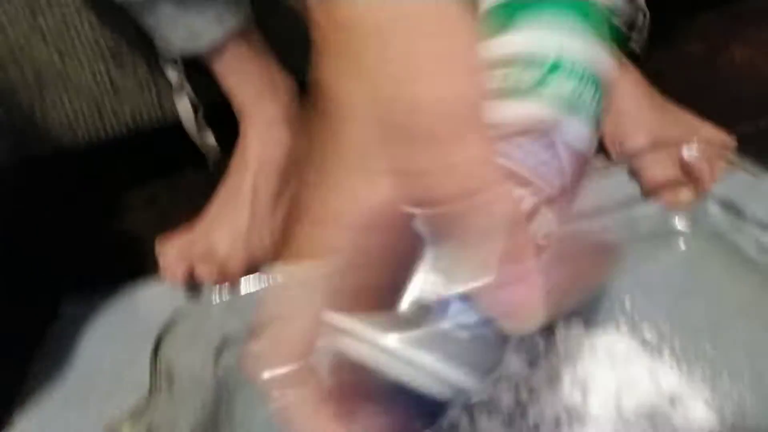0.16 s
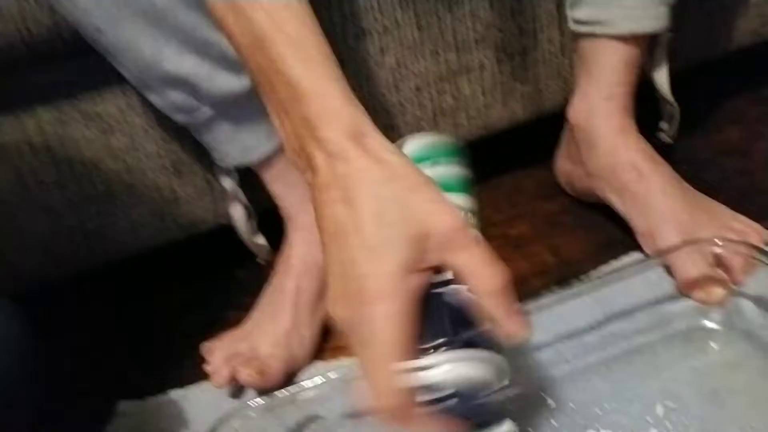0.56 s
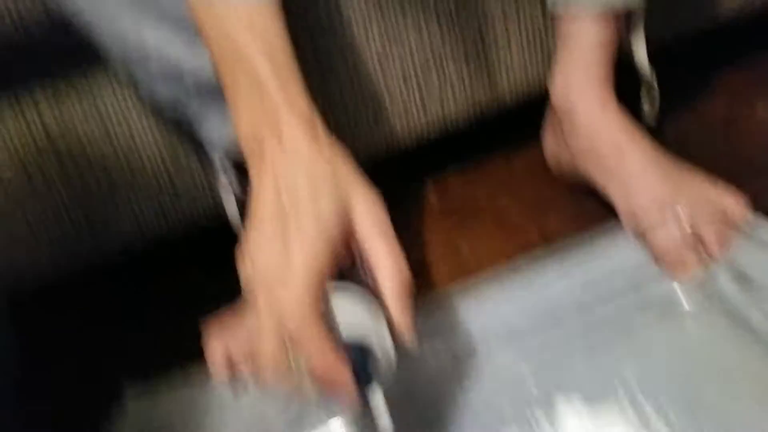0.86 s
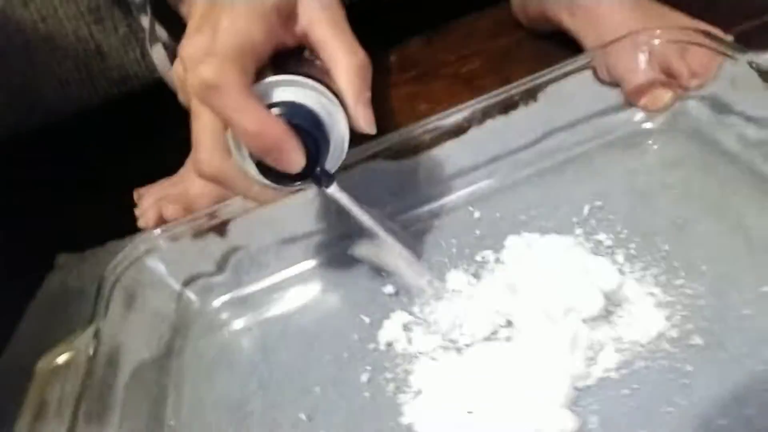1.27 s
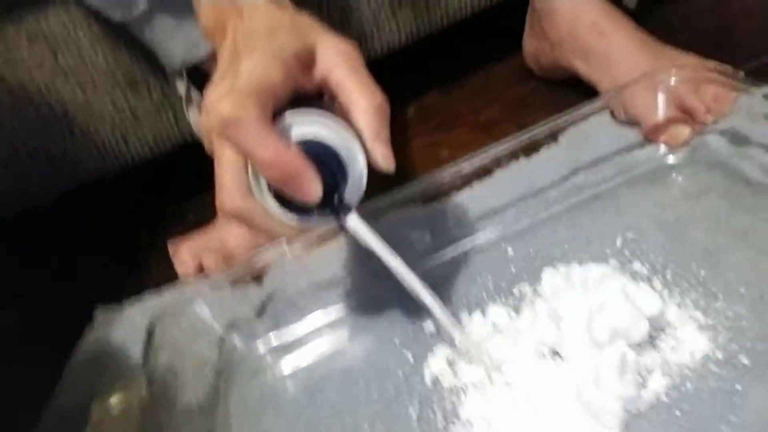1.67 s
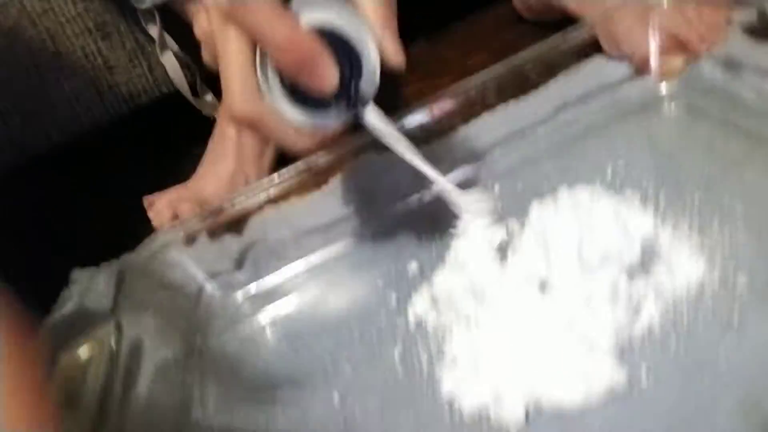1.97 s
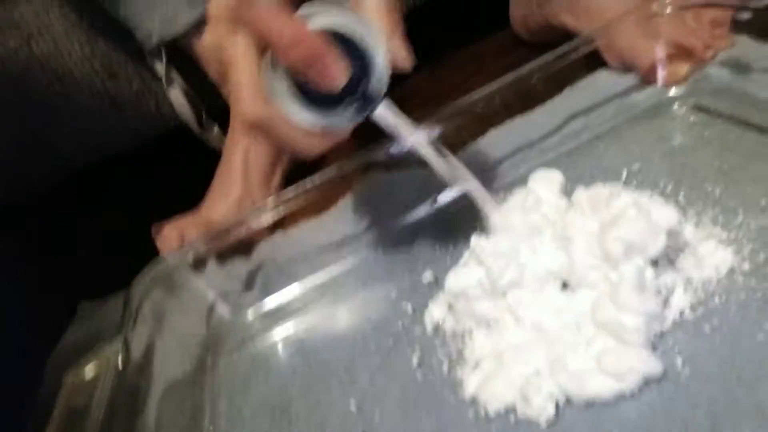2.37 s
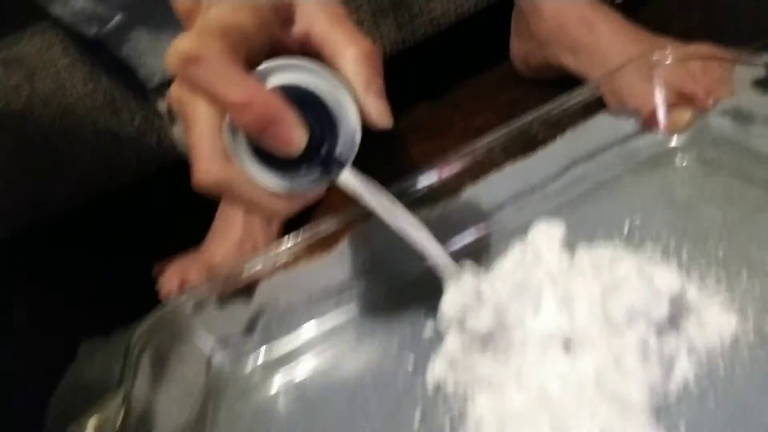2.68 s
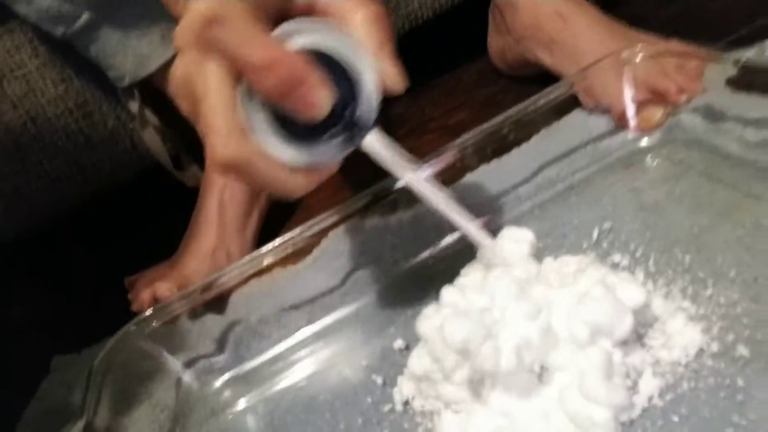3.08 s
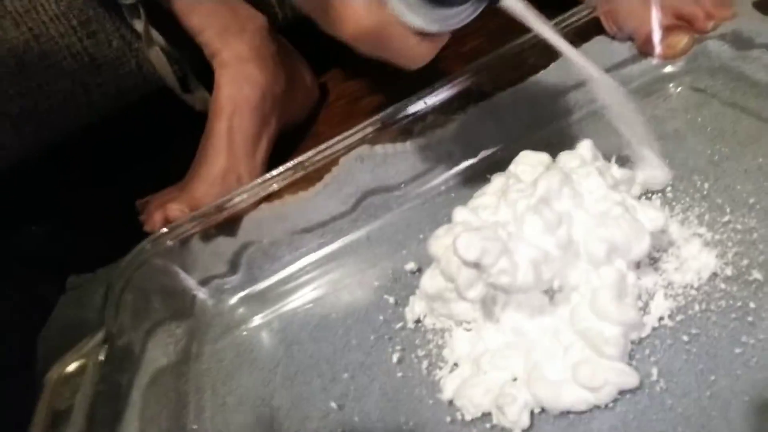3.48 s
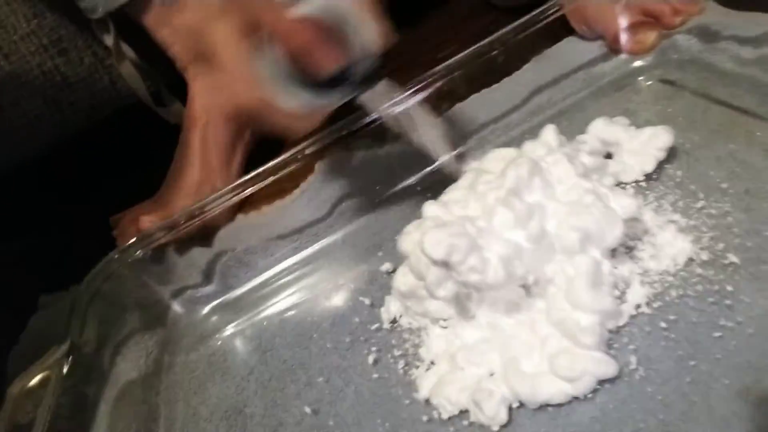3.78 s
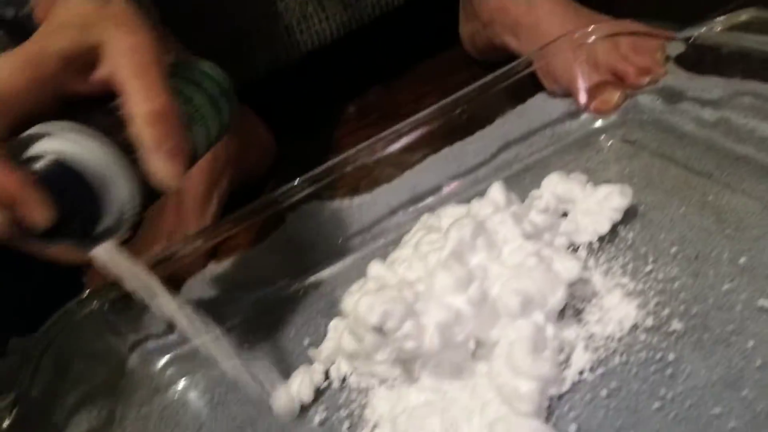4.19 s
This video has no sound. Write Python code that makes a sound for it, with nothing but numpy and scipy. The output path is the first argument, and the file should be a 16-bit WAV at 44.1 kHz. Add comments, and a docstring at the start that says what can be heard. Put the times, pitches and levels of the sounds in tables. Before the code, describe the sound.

Quiet handling first: skin and cloth rubbing, tiny clicks, a faint high squeak and a dull double thud against a dish. Then pressurized gas bursts out sharply, stutters, and becomes a softer foam jet that hisses and spits unevenly, with foam landing in a low rush. Recorded very near indoors, with short glass-dish reflections and bumps on the microphone body.

```python
"""Shaving foam sprays from an aerosol can: a propellant gas burst breaks into puffs, then a foam jet hisses and spits,
with a few later gas puffs. Jet: flickering noise bands, noisy resonances and ringing gas pockets under one uneven
flow; foam lands as a low rush.
Before it a hand shakes the can (rustle, swish, ticks, squeak) and sets it on a glass dish with a low knock.
Two hand-held microphone ports hear it from the left, with dish echo, near reflections and handling rumble."""
import sys
import numpy as np
from scipy import signal
from scipy.fft import rfft, irfft
from scipy.io import wavfile
from scipy.ndimage import map_coordinates

SR = 44100
rng = np.random.default_rng(int(sys.argv[2]) if len(sys.argv) > 2 else 0)


def persist_wave(psi):
    """Save psi, clipped to +-1, as 16-bit WAV."""
    counts = np.round(np.clip(psi, -1, 1) * 32767).astype(np.int16)
    wavfile.write(sys.argv[1], SR, np.atleast_2d(counts).T)


N = 191570

# jet: t/s, gas hiss/dB, foam hiss/dB, foam body/dB, top sizzle/dB, nozzle resonance f/Hz
JET_CURVES = [(0.935, -27, -26, -60, -36, 4360), (1.05, -24.5, -32, -49, -41, 4700),
              (1.17, -26.5, -30.5, -41, -34, 4440), (1.255, -27.5, -45, -42, -34, 4310),
              (1.29, -40, -37.5, -44, -45, 5300), (1.39, -43.5, -43.5, -44.5, -45, 5430),
              (1.52, -44.5, -44.5, -44, -54, 5293), (1.62, -44.5, -42, -43, -51, 5083),
              (1.92, -41, -39.5, -41.5, -53, 5607), (2.03, -54, -41, -46.5, -49, 4430),
              (2.45, -47.5, -43.5, -44, -51, 4523), (2.76, -45.5, -41.5, -43, -47.5, 4500),
              (3.13, -45.5, -43, -41.5, -46, 4715), (3.27, -45, -44, -42.5, -49, 3845),
              (3.41, -47.5, -41, -41.5, -51, 3880), (3.53, -46, -46, -46.5, -47, 3910),
              (3.6, -45.5, -43, -43.5, -52, 3887), (3.72, -48, -39, -42.5, -53, 4060),
              (3.8, -42.5, -40, -40.5, -51, 4710), (3.94, -46.5, -39.5, -45, -49, 4284),
              (4.11, -41, -39.5, -47, -53, 4240), (4.22, -47.5, -36.5, -47, -58, 4950),
              (4.34, -42, -35.5, -43, -59, 4960)]
# gas puffs, most as the burst breaks up, a few later in the foam jet: centre t/s, level/dB
GAS_PUFFS = [(1.278, -35), (1.302, -27.5), (1.33, -31), (1.343, -25), (1.362, -35), (1.403, -28),
             (1.42, -29), (1.434, -28), (1.448, -30), (1.471, -27), (1.489, -37), (1.507, -31),
             (1.524, -45), (1.544, -30), (1.557, -32), (1.578, -54), (1.96, -51), (2.325, -36),
             (2.612, -30), (2.874, -39), (3.554, -41)]
# open-valve resonance: t/s, f/Hz, level over gas/dB
VALVE_RESONANCE = [(.91, 3070, 5.5), (1.0, 3135, -11), (1.07, 2850, -17), (1.14, 2795, -18),
                   (1.26, 2900, -15), (1.35, 2960, -16)]
# jet resonances: t/s, nozzle level over foam hiss/dB, low resonance f/Hz, its level over foam body/dB
JET_RESONANCES = [(.92, -17, 1678, -8), (1.5, -7, 1650, -6), (1.9, -7, 1600, -8), (2.2, -2, 1622, -6.5),
                  (2.55, -3, 1615, -9), (2.8, 1, 1332, -6.5), (3.1, -3.5, 1348, -7), (3.3, -2, 1400, -5),
                  (3.55, -3.5, 1882, -6), (3.72, -8, 1823, -11), (3.85, -8.5, 1690, -6),
                  (4.34, -10, 1662, -12)]
# loud spits at the nozzle: t/s, level/dB, f/Hz
LOUD_SPITS = [(0.915, -26, 3000), (0.9205, -21, 2850), (0.924, -14.5, 3107), (0.931, -33, 3000),
              (0.9454, -31, 3050), (0.969, -12, 5970), (0.973, -19, 6800), (0.981, -11, 6900),
              (0.986, -12, 6860), (1.0074, -10.5, 2705), (1.023, -22, 793), (1.0437, -3.5, 8940),
              (1.0614, -22, 2870), (1.071, -12.5, 4610), (1.092, -11, 4950), (1.0976, -15, 6160),
              (1.1265, -17, 2730), (1.131, -7, 6100), (1.1366, -11, 8900), (1.153, -28, 2300),
              (1.1678, -6, 8800), (1.1932, -14, 3660), (1.2163, -12.5, 2876), (1.246, -14.5, 3720),
              (1.276, -21, 5560), (1.295, -16.5, 5600), (1.331, -19, 5400), (1.3608, -18, 5380),
              (1.4, -21, 5800), (1.4283, -13.5, 8270), (1.4461, -18, 5380), (1.4706, -18, 6370),
              (1.488, -14.5, 6280), (1.506, -18, 5340), (1.5224, -17, 8270), (1.5284, -7, 8530),
              (1.5444, -23, 5420), (1.61, -44, 4500), (1.6601, -25.5, 4320), (1.6855, -17, 5600),
              (1.7454, -21, 5410), (1.8312, -21, 5550), (1.847, -17.5, 5720), (1.8602, -26, 5700),
              (1.9097, -15, 5730), (2.0098, -23, 4900), (2.032, -25.5, 8160), (2.071, -21, 4100),
              (2.1268, -25, 4400), (2.2109, -25, 4350), (2.2643, -26, 5290), (2.3042, -20, 4540),
              (2.4277, -25, 5920), (2.4632, -20, 4500), (2.4845, -20.5, 4300), (2.531, -25, 5170),
              (2.613, -21.5, 5370), (2.6835, -39, 4670), (2.7487, -24, 4180), (2.7614, -28, 4300),
              (2.819, -39, 4320), (2.8724, -15.5, 4520), (2.8759, -24, 8800), (2.906, -21, 4650),
              (3.076, -25, 5260), (3.3162, -28.5, 3555), (3.413, -24.5, 4570), (3.503, -25, 5300),
              (3.5117, -24, 4180), (3.526, -26, 3800), (3.538, -22, 4295), (3.554, -19.5, 8040),
              (3.604, -29, 3660), (3.612, -26, 3800), (3.681, -24, 3890), (3.6925, -21, 7080),
              (3.7176, -28, 3760), (3.761, -27, 4830), (3.7664, -23, 7740), (3.8626, -25, 4450),
              (3.9755, -19, 7800), (3.9792, -19, 4130), (3.9898, -24, 7800), (4.0419, -23, 7830),
              (4.0647, -19, 8370), (4.1643, -20, 5150), (4.2166, -24, 3740), (4.2304, -10, 5400),
              (4.251, -19, 5093), (4.2564, -23, 5490), (4.2604, -19, 7060), (4.2775, -21, 4000),
              (4.2992, -16, 5280), (4.3201, -28, 5420), (4.3364, -17, 5180)]
# foam landing in the dish: t/s, level/dB
LANDING_CURVE = [(.9, -75), (0.95, -65), (1.02, -37.5), (1.14, -47), (1.41, -42.5), (1.6, -48.5),
                 (1.8, -46.5), (3.39, -47), (3.84, -44), (4.1, -46), (4.34, -43)]
# relative noise spectra, each: f/Hz, density/dB
GAS_SPECTRUM = [(350, -71), (600, -27), (777, -2.5), (940, -7.5), (1150, -3), (1430, -40), (1690, 5),
                (1880, -23), (2100, 2.5), (2480, -8.5), (2700, 0.5), (3250, 2), (3600, -24), (3850, 1),
                (4120, -32), (4800, -2.5), (5550, -6), (6230, -3.5), (9000, -2.5), (15500, -6.5)]
FOAM_HISS_SPECTRUM = [(1410, -43), (2400, -7), (3250, -1), (4480, 0), (4840, -1.5), (5560, -2.5),
                      (6420, -6.5), (8100, -7), (9000, -11.5), (11700, -53), (19800, -120)]
FOAM_BODY_SPECTRUM = [(590, -11), (1000, -5), (1150, -7), (1320, 5), (1440, -1.5), (1680, 2), (2180, -1.5),
                      (2480, -9.5), (2900, 0), (3770, -73), (6380, -120)]
SIZZLE_SPECTRUM = [(7060, -64), (12000, -23), (13100, -4), (14600, 8), (15500, 4)]
LANDING_SPECTRUM = [(120, -19), (200, -15), (227, -29), (280, -13), (608, 0.5), (1140, -1.5), (1300, -4),
                    (1690, -31), (2860, -120)]
RUSTLE_SPECTRUM = [(470, -32), (800, 1.5), (1140, 7), (1360, -3.5), (2090, -2), (2450, -20), (2740, -11),
                   (3560, -14), (6000, -21), (7800, -63), (13200, -120)]
RUB_SPECTRUM = [(130, -35), (220, -18), (327, -0.5), (459, -12), (683, 5), (950, 5), (1240, -47),
                (2090, -120)]
SWISH_SPECTRUM = [(1060, -35), (1800, -13), (2250, -8), (2800, -2), (3840, -5), (4980, -7.5), (6650, -13),
                  (8180, -11), (15500, -9)]
HAND_SPECTRUM = [(15, -47), (25, -8), (59, 1), (123, 7), (365, -10.5), (409, -4), (500, -15), (650, -37),
                 (1100, -120)]
# hand and can moving before the spray: t/s, scrape base level/dB, dull cloth rub/dB
MOVE_CURVES = [(0.0, -66, -55), (0.09, -49, -51), (0.108, -51, -53), (0.13, -55, -42.5), (0.19, -57, -59),
               (0.23, -60, -63), (0.34, -51.5, -54), (0.39, -52, -48.5), (0.5, -60.5, -71),
               (0.66, -51.5, -52), (0.73, -48, -49), (0.844, -46, -55), (0.9, -50, -68)]
# air round the swung can: t/s, level/dB
SWING_CURVE = [(0, -57), (.13, -54), (.2, -59.5), (.41, -44), (.51, -52), (.7, -57.5), (.85, -61)]
# small ticks of can and fingers: t/s, level/dB, f/Hz
FINGER_TICKS = [(0.055, -40.5, 500), (0.0565, -36.5, 3420), (0.0685, -48, 500), (0.0695, -37, 3400),
                (0.078, -37, 635), (0.084, -34, 690), (0.092, -35, 674), (0.119, -36, 695.6),
                (0.128, -45, 510), (0.129, -31.5, 2430), (0.135, -29, 2400), (0.163, -39, 633),
                (0.177, -39, 2544), (0.183, -31, 4000), (0.189, -41, 2720), (0.199, -31.5, 2838),
                (0.223, -44, 2400), (0.249, -39, 710), (0.268, -35, 710), (0.562, -35, 3500),
                (0.578, -42, 4000), (0.596, -32, 2690), (0.596, -34, 730), (0.688, -39, 1750),
                (0.735, -36.5, 1820), (0.765, -50, 1400), (0.792, -44, 1360), (0.831, -38, 1580),
                (0.835, -36, 1400), (0.838, -43, 1310), (0.847, -31, 1280), (0.848, -50, 3700)]
# can against the dish on the floor: t/s, click level before softening/dB
KNOCK_CLICKS = [(0.713, -26), (0.7272, -26.5), (0.941, -38.5)]
# floor resonances: f/Hz, relative level/dB, t60/s
FLOOR_MODES = [(82.5, 4.5, 0.18), (111.5, -21, 0.25), (50.3, -7, 0.11), (161, -46, .1)]
# handling rumble in the microphone body: t/s, base level/dB
RUMBLE_CURVE = [(0.0, -56.5), (0.2, -50.5), (0.3, -58), (0.54, -58), (0.59, -49.5), (0.66, -50.5),
                (0.7, -47.5), (0.81, -54), (1.1, -66), (1.29, -50.5), (1.6, -64.5), (2.08, -62),
                (2.44, -71), (2.65, -57), (3.25, -69.5), (3.8, -60), (4.02, -51.5), (4.34, -48)]
# dull bumps through the hand: t/s, level at the louder port/dB, f/Hz, left-right/dB
HAND_BUMPS = [(0.083, -31.5, 266, 12), (0.218, -35.5, 318, 4), (0.223, -33, 131, -19), (0.256, -39, 320, 2),
              (0.263, -39, 147, 9), (0.445, -33.5, 215, -31), (0.594, -41, 138.4, 4),
              (0.642, -39.5, 250, 8), (2.622, -49, 138, 0), (3.837, -33, 213, -18),
              (3.848, -29.5, 111.5, -27), (3.869, -29.5, 154, -30), (4, -30.5, 123.2, -30),
              (4.046, -31, 170, -25), (4.067, -30, 130, -31), (4.115, -27.5, 170, -32),
              (4.138, -22, 325, -31), (4.149, -26, 139, -32), (4.165, -33, 129, -29),
              (4.284, -38, 134, -28)]
# paths to the ports: t/s, right port delay/ms, left echo/ms, left echo gain,
# right echo/ms, right echo gain, landing left-right/dB
PORT_PATHS = [(.8, 0.55, 0.97, 0.48, 1, 0.074, 3), (.95, 0.16, 1.134, 0.11, 0.74, 0.23, 2.5),
              (2.0, 0.18, 1.19, 0.093, 0.657, 0.33, 0), (2.5, 0.16, 0.99, 0.22, 0.8, 0.17, -3),
              (2.9, .17, 1.07, 0.62, 0.85, 0.28, -0.5), (3.3, 0.091, 1.01, 0.097, 0.7, 0.28, 0),
              (3.6, 0.018, 0.58, 0.073, 0.63, 0.68, 2.5), (4.1, 0.3, 0.73, 0.49, 0.61, 0.15, -3)]
# body of the microphone shades the ports: f/Hz, left-right/dB
BODY_SHADOW = [(60, -12), (110, 16), (200, 1), (380, 9.5), (700, 1), (1290, 8.5), (2380, 9), (4400, 0.5),
               (8120, 8), (15000, 2)]
# spread source: f/Hz, correlation between the ports
PORT_LIKENESS = [(300, 0.92), (900, 1), (1500, 0.98), (4000, 0.41), (8000, 0.35), (15000, 0.046)]
# band thinned in spray and movement: t/s, share removed
DIP_CURVE = [(.9, 0.43), (2.3, 0.33), (2.5, 0.4), (3.1, 0.75), (3.45, 0.43), (3.65, .05), (3.95, 0.072),
             (4.1, 0.27), (4.34, .5)]

VALVE_OPENS_S, VALVE_RISE_S = .909, .009
SPUTTER_DB = 2.5  # dB per unit of flow
PUFF_S = 0.0023  # centre to 1/e of power
PUFF_BODY_SHARE, PUFF_SIZZLE_SHARE = 0.41, 0.31  # shares of the gas lift/dB
SPIT_CYCLES, SPIT_NOISE = 3.43, 0.45
SMALL_SPITS, SMALL_FROM_S = 60, 1.0
SMALL_OVER_FOAM_DB, SMALL_SPREAD_DB, SMALL_PITCH_SPREAD = 13.5, 1, 0.076
TICK_CYCLES, TICK_NOISE = 0.58, 0.25
SQUEAK_S, SQUEAK_LENGTH_S, SQUEAK_START_DB = .6, .076, -58
SQUEAK_HZ, SQUEAK_DROP_HZ = 10700, 600
KNOCK_SOFT_HZ = 250  # a soft contact carries no treble
BUMP_CYCLES = 0.46
RIM_LEAD_MS, RIM_SHARE = 0.17, 0.23  # upright echo just ahead of the inverted one
NEAR_ECHO_MS, NEAR_ECHO_GAIN = 0.322, -0.16  # left port only, off the hand beside it
ROOM_DB, ROOM_LOW_CUT_HZ, ROOM_T60_S, ROOM_CHANGE_S = -3.5, 1180, .04, .4
DIP_HZ, DIP_WIDTH_HZ = 1030, 410
MIC_LOW_CUT_HZ, CUTOFF_HZ, PEAK_TOP = 31, 15500, .9
BLIP_SAMPLES = 3000


def jet():
    """Flow through the valve: one uneven flow makes gas and foam sputter together; spits burst on top."""
    gas_db, hiss_db, body_db, sizzle_db, nozzle_hz = in_time(JET_CURVES)
    lift_db = puff_lift(gas_db)
    flow = 0.096 * drift(36.0) + 0.38 * drift(56.0) + 0.69 * drift(230.0)
    sputter = from_db(SPUTTER_DB * flow)
    steady = gas(gas_db, lift_db) + foam(hiss_db, body_db, nozzle_hz, flow)
    body = from_db(body_db + PUFF_BODY_SHARE * lift_db) * patchy(FOAM_BODY_SPECTRUM, 2.0, rate_hz=7.3, count=3)
    sizzle = from_db(sizzle_db + PUFF_SIZZLE_SHARE * lift_db) * patchy(SIZZLE_SPECTRUM, 1.5, rate_hz=47.0, count=2)
    # the low and topmost layers follow the flow less
    layers = sputter * steady + sputter ** 0.72 * body + sputter ** 0.14 * sizzle + landing(sputter)
    valve = np.clip((np.arange(N) / SR - VALVE_OPENS_S) / VALVE_RISE_S, 0, 1) ** 2
    return valve * layers + spits(hiss_db, nozzle_hz)


def gas(gas_db, lift_db):
    """Propellant: turbulent hiss, the open valve's resonance and bursting pockets."""
    hiss = from_db(gas_db + lift_db) * patchy(GAS_SPECTRUM, 2.5, rate_hz=70.0, count=8)
    tone_hz, tone_db = in_time(VALVE_RESONANCE)
    tone = from_db(gas_db + tone_db) * whistle(tone_hz, width_hz=330)
    pockets = pops(900, spread_db=4.5, low_hz=2300, high_hz=9600, t60_cycles=4.4)
    return hiss + tone + from_db(gas_db + lift_db - 11.0) * pockets


def puff_lift(gas_db):
    """Gaussian puffs add power to the gas; returns the rise in dB over its steady level."""
    t = np.arange(N) / SR
    power = sum(from_db(2 * db) * np.exp(-((t - s) / PUFF_S) ** 2) for s, db in GAS_PUFFS)
    return 10 * np.log10(1 + power / from_db(2 * gas_db))


def foam(hiss_db, body_db, nozzle_hz, flow):
    """Foam jet: hiss, two noise-driven resonances and crackle that thickens with the flow."""
    hiss = from_db(hiss_db) * patchy(FOAM_HISS_SPECTRUM, 4.0, rate_hz=36.0, count=5)
    nozzle_db, low_hz, low_db = in_time(JET_RESONANCES)
    nozzle = from_db(hiss_db + nozzle_db) * whistle(nozzle_hz, width_hz=710)
    low = from_db(body_db + low_db) * whistle(low_hz, width_hz=240)
    per_s = 600 * from_db(2.1 * flow)
    crackle = pops(per_s, spread_db=11.0, low_hz=4000, high_hz=11200, t60_cycles=6.7)
    return hiss + nozzle + low + from_db(hiss_db - 13.5) * crackle


def spits(foam_db, nozzle_hz):
    """Gas pockets at the nozzle: listed loud ones, and random small ones tied to foam level and resonance."""
    at = rng.integers(round(SMALL_FROM_S * SR), N, SMALL_SPITS)
    size, pitch = rng.standard_normal((SMALL_SPITS, 2)).T
    small_db = foam_db[at] + SMALL_OVER_FOAM_DB + SMALL_SPREAD_DB * size
    small_hz = nozzle_hz[at] * np.exp(SMALL_PITCH_SPREAD * pitch)
    events = LOUD_SPITS + list(zip(at / SR, small_db, small_hz))
    return blips(events, SPIT_CYCLES, SPIT_NOISE, width_hz=790,
                 broad_db=-15.0, broad_hz=[2200, 11500], brief_hz=3000)


def landing(sputter):
    """Foam hitting the dish: a low rush whose place shifts left and right."""
    rush = from_db(in_time(LANDING_CURVE)[0]) * patchy(LANDING_SPECTRUM, 0.5, rate_hz=15.0, count=3)
    pan_db = in_time(PORT_PATHS)[-1]
    return rush * sputter ** 0.45 * from_db(pan_db * [[.5], [-.5]])


def moving():
    """Skin and cloth rustle in grains, air swishes round the can, fingers tick."""
    rustle_db, rub_db = in_time(MOVE_CURVES + [(1.0, -75, -75)])
    rustle = from_db(rustle_db - 0.5 + 1.9 * drift(87.0)) * patchy(RUSTLE_SPECTRUM, 0.5, rate_hz=18.0, count=4)
    grains = from_db(rustle_db - 9.5) * pops(270, spread_db=1.5, low_hz=500, high_hz=3800, t60_cycles=1.6)
    rub = from_db(rub_db + 2.6 * drift(58.0)) * patchy(RUB_SPECTRUM, 2.0, rate_hz=7.5, count=2)
    swish = from_db(in_time(SWING_CURVE)[0]) * patchy(SWISH_SPECTRUM, 1.0, rate_hz=16.0, count=2)
    ticks = blips(FINGER_TICKS, TICK_CYCLES, TICK_NOISE, width_hz=1100,
                  broad_db=-6.5, broad_hz=[600, 4200], brief_hz=1500)
    return rustle + grains + rub + swish + ticks


def squeak():
    """Finger on can: a thin unsteady sine, sagging at its end, louder at the left port."""
    done = np.clip((np.arange(N) / SR - SQUEAK_S) / SQUEAK_LENGTH_S, 0, 1)
    pitch_hz = SQUEAK_HZ - SQUEAK_DROP_HZ * done ** 5 + 70 * drift(120.0)
    level = from_db(SQUEAK_START_DB + 6 * done) * np.abs(np.sin(np.pi * done)) ** .3
    tone = np.sin(2 * np.pi * np.cumsum(pitch_hz) / SR)
    return level * (done < 1) * tone * from_db([[2.5], [-2.5]])


def knock():
    """Soft blows of the can on the dish set the floor under it ringing."""
    clicks = np.zeros(N)
    for s, click_db in KNOCK_CLICKS:
        clicks[round(s * SR)] = from_db(click_db)
    soft = signal.sosfilt(signal.butter(2, KNOCK_SOFT_HZ, fs=SR, output="sos"), clicks + 1e-18)
    return sum(from_db(db) * ring(soft, hz, t60_s) for hz, db, t60_s in FLOOR_MODES)


def handling():
    """Grip on the microphone: lumpy low noise, partly opposite at the two ports, and single bumps."""
    level_db, = in_time(RUMBLE_CURVE)
    other, common = patchy(HAND_SPECTRUM, 3.5, rate_hz=8.0, count=4)
    opposed = np.roll(other, N // 2)  # the shift makes it unrelated to the common part
    out = from_db(level_db) * (common + 0.37 * opposed * [[1], [-1]]) * from_db([[-2.5], [1.5]])
    for s, level_db, hz, pan_db in HAND_BUMPS:
        shape, phase = blip(hz, BUMP_CYCLES)
        at = round(s * SR)
        bump = (from_db(level_db) * shape * np.sin(phase))[:N - at]
        out[:, at:at + len(shape)] += bump * from_db([[min(pan_db, 0)], [min(-pan_db, 0)]])
    return out


def ports(x):
    """Direct sound, dish echoes, near reflections and body shadow at each port."""
    late_ms, left_ms, left_gain, right_ms, right_gain, _ = in_time(PORT_PATHS)
    direct = [x[0] + NEAR_ECHO_GAIN * delayed(x[0], NEAR_ECHO_MS), delayed(x[1], late_ms)]
    out = []
    for side, (echo_ms, gain) in enumerate([(left_ms, left_gain), (right_ms, right_gain)]):
        rim = RIM_SHARE * np.roll(direct[side], -round(RIM_LEAD_MS * SR / 1000))
        echo = gain * delayed(direct[side] - rim, echo_ms)
        heard = direct[side] - echo + from_db(ROOM_DB) * room(x[side])
        out.append(coloured(heard, BODY_SHADOW, share=.5 - side))
    return np.array(out)


def room(x):
    """Near reflections as decaying noise tails, renewed in crossfades as can and microphone move."""
    hop, age_s = round(ROOM_CHANGE_S * SR), np.arange(round(.1 * SR)) / SR
    padded = np.concatenate([np.zeros(hop), x, np.zeros(2 * hop)])
    out = np.zeros(len(padded) + len(age_s))
    for at in range(0, N + hop, hop):
        tail = rng.standard_normal(len(age_s)) * from_db(-60 * age_s / ROOM_T60_S)
        piece = padded[at:at + 2 * hop] * np.sqrt(np.hanning(2 * hop))
        out[at:at + 2 * hop + len(age_s) - 1] += signal.fftconvolve(piece, tail / np.linalg.norm(tail))
    return signal.sosfilt(signal.butter(2, ROOM_LOW_CUT_HZ, "high", fs=SR, output="sos"), out[hop:hop + N])


def thinned(x):
    """Subtract a changing share of one resonant band."""
    band = signal.lfilter(*signal.iirpeak(DIP_HZ, DIP_HZ / DIP_WIDTH_HZ, fs=SR), x)
    return x - np.clip(in_time(DIP_CURVE)[0], 0, 1) * band


def patchy(spectrum, patchy_db, rate_hz, count):
    """Turbulence: two-port noise in bands that flicker each on their own, then coloured; rms 1."""
    top_hz = min(spectrum[-1][0], .45 * SR)
    edges_hz, out = np.geomspace(spectrum[0][0], top_hz, num=count + 1), 0
    white = rng.standard_normal((2, 2, N))  # neighbouring bands get unrelated noise
    for k, pair_hz in enumerate(zip(edges_hz, edges_hz[1:])):
        band = signal.butter(1, pair_hz, "band", fs=SR, output="sos")
        same, own = signal.sosfilt(band, white[k % 2])
        alike = np.clip(at_hz(PORT_LIKENESS, pair_hz[1]), 0, 1)
        right = alike * same + np.sqrt(1 - alike ** 2) * own
        out = out + from_db(patchy_db * drift(rate_hz)) * np.array([same, right])
    return rms_one(coloured(out, spectrum))


def whistle(centre_hz, width_hz):
    """Noise in one moving resonance: slow noise carried up to its centre; rms 1."""
    slow = signal.sosfilt(signal.butter(2, width_hz / 2, fs=SR, output="sos"), rng.standard_normal((2, N)))
    phase = 2 * np.pi * np.cumsum(centre_hz) / SR
    return rms_one(slow[0] * np.cos(phase) + slow[1] * np.sin(phase))


def pops(per_s, spread_db, low_hz, high_hz, t60_cycles):
    """Small bursts at random, each ringing a double resonator at one of 14 pitches; rms 1."""
    sizes = from_db(spread_db * np.minimum(rng.exponential(1, N), 4)) * rng.choice([-1, 1], N)
    born = rng.random(N) < per_s / SR
    dealt = rng.integers(0, 14, N)
    out = np.zeros(N)
    for k, hz in enumerate(np.geomspace(low_hz, high_hz, num=14)):
        once = ring(sizes * born * (dealt == k), hz, t60_cycles / hz)
        out += ring(once, hz, t60_cycles / hz)
    return rms_one(out)


def blips(events, cycles, noise, width_hz, broad_db, broad_hz, brief_hz):
    """Each event is a short ring, noise round the same pitch and a brief broad puff."""
    out = np.zeros(N + BLIP_SAMPLES)
    white = rng.standard_normal((len(events), 2, BLIP_SAMPLES))
    slow = rms_one(signal.sosfilt(signal.butter(1, width_hz / 2, fs=SR, output="sos"), white[:, 0]))
    broad = rms_one(signal.sosfilt(signal.butter(2, broad_hz, "band", fs=SR, output="sos"), white[:, 1]))
    brief, _ = blip(brief_hz, cycles)
    for (s, level_db, hz), wobble, puff in zip(events, slow, broad):
        shape, phase = blip(hz, cycles)
        share = np.clip(noise, 0, 1) * min(hz / width_hz / 2, 1)  # low rings stay cleaner
        tone = shape * (1 - share + share * wobble) * np.sin(phase)
        sound = tone + from_db(broad_db) * brief * puff
        out[round(s * SR):][:BLIP_SAMPLES] += from_db(level_db) * sound
    return out[:N]


def blip(hz, cycles):
    """Envelope and phase of a ring that swells, then dies; its peak comes at twice the cycles."""
    turns = np.arange(BLIP_SAMPLES) * hz / SR
    rise = turns / max(cycles, .2) / 2
    return (rise * np.exp(1 - rise)) ** 3, 2 * np.pi * turns


def ring(clicks, hz, t60_s):
    """Two-pole resonator: a unit click sets a decaying sine of height 1 ringing."""
    r, w = from_db(-60 / (t60_s * SR)), 2 * np.pi * hz / SR
    return signal.lfilter([0, np.sin(w)], [1, -2 * r * np.cos(w), r * r], clicks + 1e-18)


def drift(rate_hz):
    """Slow chance: noise at every 20th sample through a double one-pole low-pass; rms 1."""
    r = np.exp(-40 * np.pi * rate_hz / SR)
    white = rng.standard_normal(N // 20 + 2002)
    slow = signal.lfilter([1], [1, -2 * r, r * r], white)[2000:]  # drop the settling
    return np.interp(np.arange(N) / 20, np.arange(len(slow)), rms_one(slow))


def coloured(x, db_points, share=1):
    """Impose a spectrum, scaled in dB by share."""
    hz = np.maximum(np.fft.rfftfreq(N, 1 / SR), 1)
    return irfft(rfft(x) * from_db(share * at_hz(db_points, hz)), N)


def delayed(x, ms):
    """Read a sound some milliseconds back; the delay may move."""
    return map_coordinates(x, [np.arange(N) - ms * SR / 1000], order=2)


def at_hz(points, hz):
    """Read a spectrum on a log-frequency axis."""
    points_hz, values = np.array(points).T
    return np.interp(np.log(hz), np.log(points_hz), values)


def in_time(rows):
    """Columns of a curve table, one value per sample."""
    s, *columns = np.transpose(rows)
    return [np.interp(np.arange(N) / SR, s, c) for c in columns]


def from_db(db):
    """dB to gain."""
    return 10 ** (np.asarray(db) / 20)


def rms_one(x):
    """Scale to rms 1."""
    return x / np.sqrt(np.mean(x ** 2) + 1e-20)


def scene():
    """All sources at the two ports."""
    airborne = thinned(ports(jet() + moving()))
    return airborne + squeak() + knock() + handling()


def record(dry):
    """The small microphone loses the deepest bass and rounds high peaks; the top is cut steeply."""
    thin = signal.sosfilt(signal.butter(2, MIC_LOW_CUT_HZ, "high", fs=SR, output="sos"), dry)
    rounded = PEAK_TOP * np.tanh(thin / PEAK_TOP)
    return signal.sosfilt(signal.ellip(12, .3, 80, CUTOFF_HZ, fs=SR, output="sos"), rounded)


dry = scene()
out = record(dry)
persist_wave(out)
```